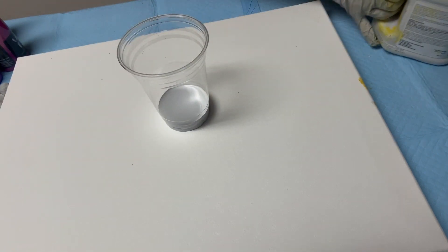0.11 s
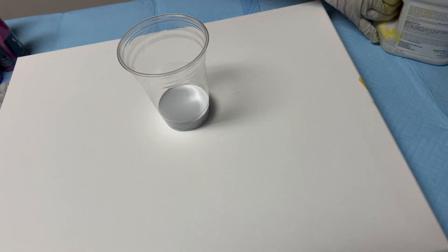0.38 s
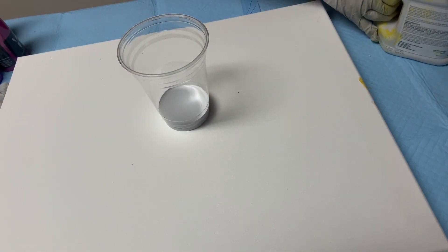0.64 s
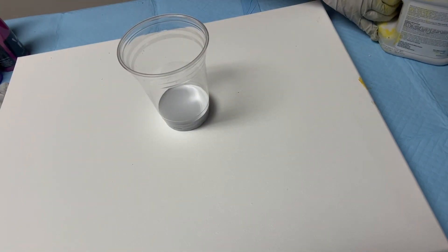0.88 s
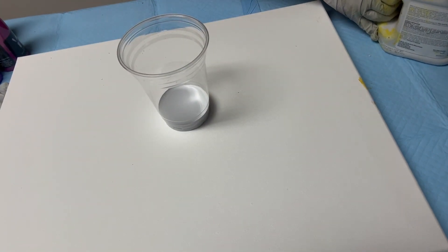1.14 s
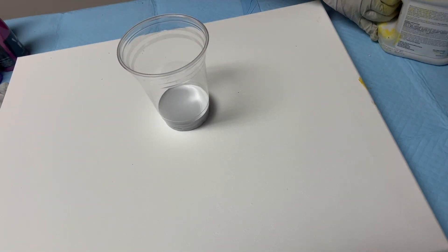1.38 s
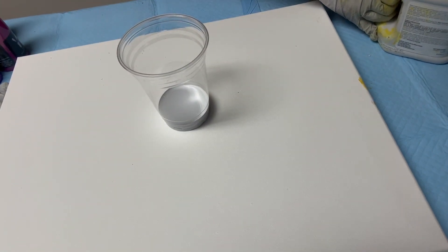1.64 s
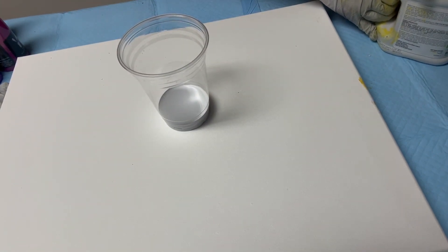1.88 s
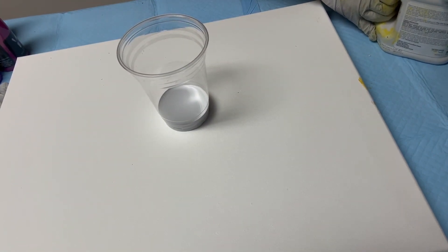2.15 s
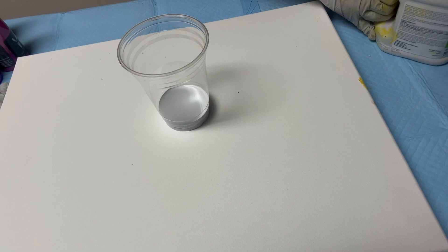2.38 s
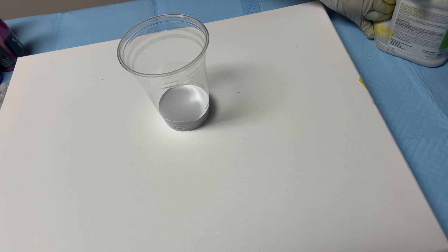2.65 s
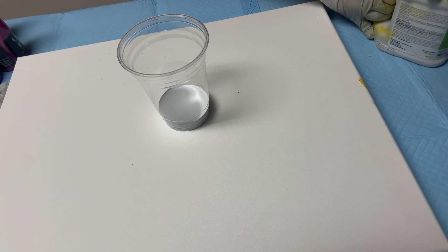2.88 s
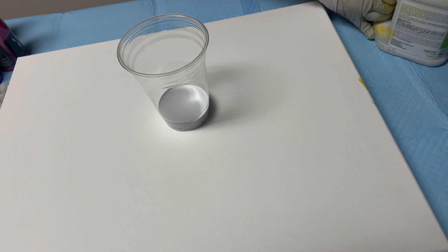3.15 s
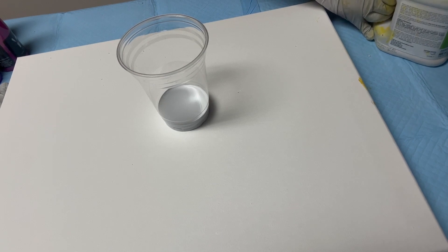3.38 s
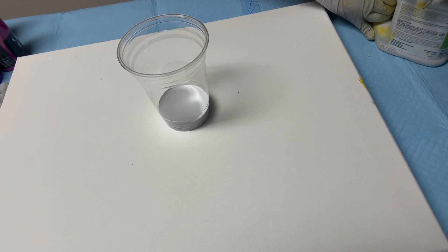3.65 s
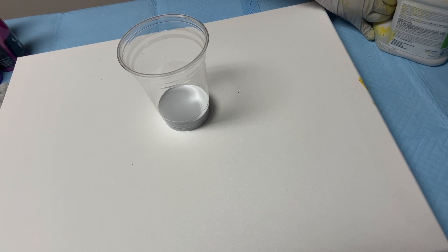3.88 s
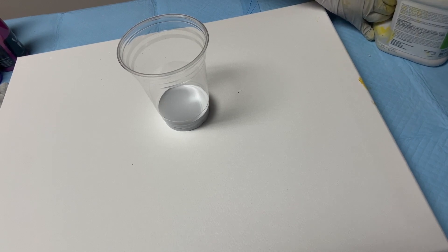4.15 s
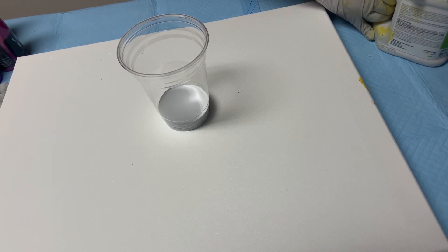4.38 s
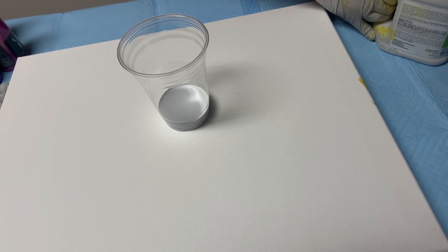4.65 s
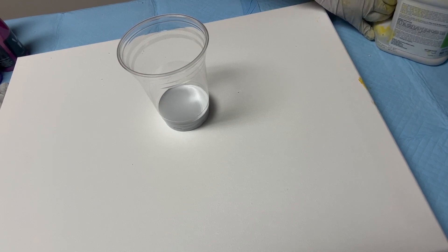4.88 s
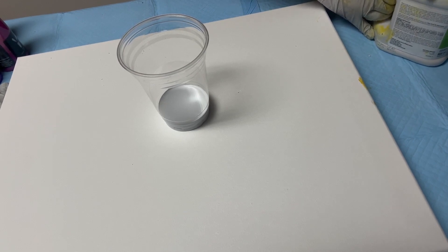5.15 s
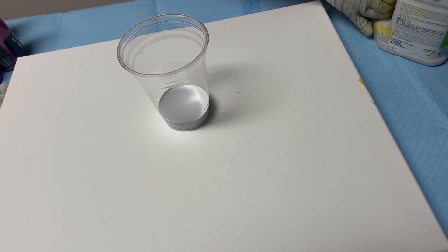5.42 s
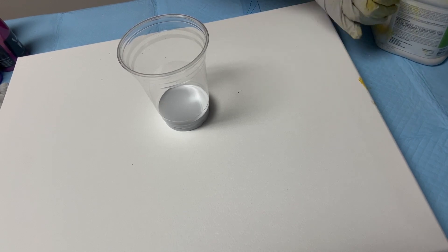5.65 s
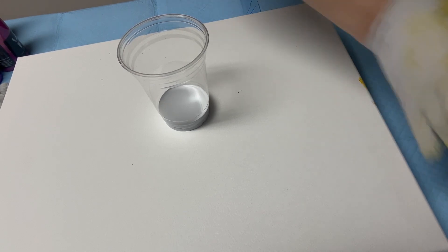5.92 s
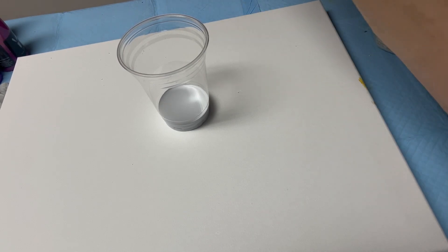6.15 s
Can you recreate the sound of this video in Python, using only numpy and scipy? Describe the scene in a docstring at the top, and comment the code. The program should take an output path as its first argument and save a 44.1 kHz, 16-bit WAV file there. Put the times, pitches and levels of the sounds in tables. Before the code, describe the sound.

Close stereo sound of gloved hands moving plastic bottles on a cloth-covered folding table in a small, quiet, dry room. At 0 seconds a heavy low table thump lands with hollow bottle clunks, with another bump near 0.2. From 0.35 to 0.7 a run of dull knocks and juddering follows, then a near lull. Two firm, hollow knocks with bright ticks strike at about 1.2 and 1.35. Light rustling continues, with a crisp isolated tick at 2.4, and soft rocking knocks at 2.45 to 2.8. From 3.2 to 3.5 bottles bump and scrape gently; between 4.1 and 4.35 comes the strongest dry swish and scrape, ending in a small knock. Soft double contact at 4.75, faint bumps around 5.15, a tiny tick near 5.9, and a last fading rustle at 6.1. Bottles sit slightly right, gloves slightly left, over faint room noise.

```python
"""Gloved hands moving plastic bottles

Gloved hands turn and slide plastic bottles on a cloth-covered folding table in a quiet room.
Scrape and swish are dense random clicks coloured by cloth and glove; the scrape also rings the thin shells.
Judder and knocks ring the bottles' modes; thumps and leaning hands make the table boom near 56 Hz.
Two spaced microphones hear the bottles first on the right and the gloves slightly earlier on the left."""
import sys
import numpy as np
from scipy import signal
from scipy.fft import rfft, irfft, next_fast_len
from scipy.io import wavfile

SR = 44100
rng = np.random.default_rng(int(sys.argv[2]) if len(sys.argv) > 2 else 0)


def undo_db(level):
    """Turn decibels back into plain size, where 20 dB means ten times bigger."""
    steps = np.asarray(level, float) / 20
    return 10 ** steps


def store_pcm(level_fs):
    """Save levels as 16-bit WAV."""
    pcm = np.round(np.clip(level_fs, -1, 1) * 32767).astype(np.int16)
    wavfile.write(sys.argv[1], SR, np.atleast_2d(pcm).T)


N = 276850  # length in samples


def rms_one(x):
    """Scale a sound to an rms of 1."""
    return x / np.sqrt(np.mean(x ** 2) + 1e-20)


def colour(x, points, lag_ms=0):
    """Filter a sound to a spectrum of (Hz, dB) points and delay it."""
    size = next_fast_len(N + 4096)
    hz = np.arange(size // 2 + 1) * SR / size + 1
    point_hz, point_db = np.transpose(points)
    db = np.interp(np.log(hz), np.log(point_hz), point_db)
    delay = np.exp(-2j * np.pi * hz * lag_ms / 1000)
    return irfft(rfft(x, size) * undo_db(db) * delay, size)[..., :N]


def drift(rate_hz):
    """Slow random wander of rms 1: noise smoothed by two equal low-pass poles."""
    step = 40  # samples between computed points
    pole = np.exp(-2 * np.pi * rate_hz * step / SR)
    noise = rng.standard_normal(N // step + 2002)
    slow = signal.lfilter([1], [1, -2 * pole, pole * pole], noise)[2000:]  # drop the run-in
    return np.interp(np.arange(N) / step, np.arange(len(slow)), rms_one(slow))


def ring(force, hz, t60_s):
    """One mode: a unit click sets a decaying sine of height 1 ringing."""
    r = undo_db(-60 / (t60_s * SR))
    w = 2 * np.pi * hz / SR
    return signal.lfilter([0, np.sin(w)], [1, -2 * r * np.cos(w), r * r], force + 1e-18)


def grains(per_s, spread_db):
    """Random clicks of uneven size and either sign, rms 1."""
    sizes = undo_db(spread_db * np.minimum(rng.exponential(1, N), 4))
    signed = sizes * rng.choice([-1, 1], N)
    return rms_one(signed * (rng.random(N) < per_s / SR))


def blows(events, spread_db, lead_ms, click_db):
    """Soft contacts: a click, and a body bouncing on its stiffness while the touch swells and lets go."""
    force = np.zeros(N + 2 * SR)  # a second of spare room at each end
    scatter = rng.normal(0, 1, (len(events), 2)) * spread_db
    for (s, db, hz, ms, edge_db), (off_db, edge_off_db) in zip(events, scatter):
        t = np.arange(max(int(ms * SR / 1000), 8)) / SR
        touch = np.sin(np.pi * np.sqrt(t / t[-1])) ** 2
        bounce = touch * np.sin(2 * np.pi * hz * t) / touch.sum()
        start = SR + round((s - lead_ms / 1000) * SR)
        force[start:][:len(t)] += undo_db(db + off_db) * bounce
        force[start + len(t) // 8] += undo_db(db + edge_db + click_db + 2 * edge_off_db)
    return force[SR:SR + N]


def movements(rows, attack_db_per_s, release_db_per_s):
    """Each row swells in, glides between its two levels and dies away; the loudest counts.

    Returns the main level and the second level, in dB."""
    t = np.arange(0, N / SR + .002, .001)
    s, length, first_db, last_db, second_db = np.transpose(rows)[..., None]
    length = np.maximum(length, .001)
    db = first_db + (last_db - first_db) * np.clip((t - s) / length, 0, 1)
    db = db - attack_db_per_s * np.maximum(s - t, 0)
    db = db - release_db_per_s * np.maximum(t - s - length, 0)
    return [np.interp(np.arange(N) / SR, t, level.max(axis=0)) for level in (db, db + second_db)]


# Colour of the quiet room: pitch_hz, relative level_db
ROOM_TONE_SPECTRUM = [(30, -15), (60, -8.5), (130, -19.5), (300, -18), (700, -30.5), (1500, -30),
                      (4000, -34.5), (10000, -36), (16000, -51.5)]


def room_tone():
    """Steady coloured noise, partly shared between the two sides."""
    common, own = rng.standard_normal(N), rng.standard_normal((2, N))
    return undo_db(-72) * rms_one(colour(common + 2.05 * own, ROOM_TONE_SPECTRUM))


# How hard the hands leaning on the table keep it swaying: time_s, relative level_db
TABLE_SWAY = [(0.0, -52), (0.63, -57.5), (0.99, -73), (1.19, -78), (1.35, -60), (1.94, -66.5), (2.5, -71),
              (2.69, -62), (2.85, -73), (3.09, -73), (3.27, -56), (3.72, -73.5), (4.21, -61), (4.37, -76),
              (4.74, -64), (4.95, -76), (5.28, -67.5), (6.28, -82.5)]
# Thumps on the table: time_s, relative level_db, rocking_hz, contact_ms, click_db relative to the thump
TABLE_THUMPS = [(0.0, -8.5, 61, 16.6, -8), (0.027, -37, 58, 4.3, 8.5), (0.19, -19, 67.4, 46, -13),
                (0.477, -55, 67.3, 31, -17), (0.673, -43, 55.3, 34, -1.5), (0.92, -58, 68, 37, -5),
                (1.195, -33, 69, 59, -4), (1.278, -55, 61, 57, -2), (1.356, -42.5, 59.2, 18, 3),
                (1.44, -44, 66.4, 27, -13), (1.55, -45, 59.5, 95, -10), (1.847, -61, 66, 35, -25),
                (2.131, -53, 68, 33, -3), (2.303, -62, 59.5, 68, 3), (2.543, -44.5, 61.5, 25, -4),
                (2.587, -44, 53, 34, -6), (2.649, -40, 69, 62, -10), (2.718, -49, 57.3, 34, -10),
                (2.783, -45.5, 63, 48, -26), (3.069, -59, 59.2, 44, -11), (3.18, -36.5, 62, 48, -18),
                (3.249, -47, 65.5, 50, -28), (3.307, -39.5, 69, 65, -17), (3.415, -50, 68, 60, -6),
                (3.738, -58, 67.3, 47, -3), (4.081, -46.5, 63, 46, -13), (4.13, -49, 59.2, 50, -22),
                (4.309, -49.5, 63, 53, -16), (4.564, -54.5, 68.4, 48, -7), (4.64, -44.5, 60, 64, -13),
                (4.698, -48, 64, 45, -0.5), (4.787, -49.5, 56, 25, -13), (5.171, -49.5, 67.3, 35, -2),
                (5.197, -58.5, 53.8, 36, 13), (5.417, -55, 60, 55, -4), (5.46, -52, 56, 66, -8),
                (5.939, -61.5, 59, 23, 1)]
# Ringing modes of the table top: pitch_hz, relative level_db, t60_s (time to fall 60 dB)
TABLE_MODES = [(56.2, 10.5, 0.21), (65.4, -2, 0.12), (84.6, -9, 0.16), (107.4, -2.5, 0.23)]


def table_top():
    """The top booms on thumps and on the uneven weight of the hands, which is noise."""
    # each contact begins 9 ms before its time_s
    thumps = undo_db(5.5) * blows(TABLE_THUMPS, spread_db=0.5, lead_ms=9, click_db=-7.5)
    sway_s, sway_db = np.transpose(TABLE_SWAY)
    sway_db = np.interp(np.arange(N) / SR, sway_s, sway_db)
    sway = undo_db(sway_db - 29) * rng.standard_normal(N)
    return sum(undo_db(db) * ring(thumps + sway, hz, t60_s) for hz, db, t60_s in TABLE_MODES)


# Left side of the boom compared with the right: pitch_hz, level_db
BOOM_LEFT_SHADE = [(50, -0.7), (150, -3.5)]


def table_boom():
    """The boom travels through the table and reaches both sides nearly alike, the left 1 ms later."""
    boom = table_top()
    return np.array([colour(boom, BOOM_LEFT_SHADE, lag_ms=1.0), boom])


# Hand strokes, speeding up or slowing down; levels are relative:
# start_s, length_s, swish_start_db, swish_end_db, scrape_db relative to the swish
HAND_STROKES = [(0.0, 0.049, -61, -78, 7), (0.09, .085, -75.5, -60.5, 3), (0.24, 0.022, -55.5, -49.5, -5.5),
                (0.3, 0.27, -74, -83, 6), (0.56, 0.052, -74, -76.5, 7.5), (0.79, .1, -67.5, -66.5, -7.5),
                (0.9, 0.051, -59.5, -63.5, -6), (1.0, .09, -78, -72, -9), (1.11, 0.063, -73.5, -61, 2),
                (1.22, 0.097, -72.5, -74.5, 6.5), (1.335, .11, -66.5, -75, 10),
                (1.47, 0.064, -76.5, -85, 6.5), (1.63, 0.083, -68, -55, 0), (1.72, .1, -55, -64, -7),
                (1.86, 0.065, -73.5, -76.5, 4.5), (1.99, 0.14, -66, -60, 5), (2.12, 0.13, -61.5, -64.5, 8),
                (2.34, 0.11, -72.5, -66.5, 8.5), (2.43, .06, -66.5, -71.5, 5), (2.5, 0.2, -63.5, -59, 3),
                (2.68, 0.1, -58.5, -67, 1), (2.85, 0.09, -74.5, -72.5, -1.3),
                (2.95, 0.035, -60.5, -57, -6.5), (3.0, .2, -63.5, -70, -5.5), (3.3, 0.15, -63.5, -60, 5),
                (3.46, 0.15, -54.5, -66, 0.5), (3.65, 0.076, -74.5, -76, 3.5),
                (3.73, 0.039, -63, -61.5, -24), (3.84, 0.069, -60.5, -73.5, -13),
                (3.95, 0.022, -66.5, -66.5, 3), (4.0, 0.056, -77, -70, 4), (4.075, 0.016, -51.5, -54, -3),
                (4.1, 0.22, -58.5, -54, 2), (4.31, 0.035, -49, -57, -2), (4.43, 0.074, -68.5, -61.5, -6.5),
                (4.53, 0.062, -67.5, -55.5, -6.5), (4.795, 0.29, -61.5, -62.5, 2),
                (5.22, .05, -71, -82, -7.5), (5.3, 0.012, -61.5, -57.5, -8.5),
                (5.38, 0.11, -71.5, -60, -0.8), (5.48, 0.12, -65, -61, -1.7), (5.63, 0.01, -50.5, -55, -12),
                (5.8, 0.12, -72.5, -72, -0.5), (5.95, 0.11, -80, -85.5, 3), (6.095, .185, -61.5, -73, -9)]


def hand_strokes():
    """The loudness in dB of the glove swish and of the cloth scrape, from the same strokes."""
    return movements(HAND_STROKES, attack_db_per_s=600, release_db_per_s=309)


# Single ticks: time_s, relative level_db, decay_ms (fall to 37 percent), low_part_db relative to the tick
SINGLE_TICKS = [(0.2369, -46, 1.3, 7), (0.3529, -54, 1.3, 8), (0.6518, -57.5, 3.3, 0),
                (1.1696, -45, 3.9, -18), (1.191, -41.5, 3.8, 3), (1.3356, -41.5, 3.6, -12),
                (1.4604, -46, 3.3, -6), (1.515, -57, 2.2, -1), (1.621, -43, 2.8, 0), (2.2865, -45, 2.1, 2),
                (2.4143, -34, 1.9, -22), (2.9387, -55, 1.4, -13), (3.243, -56.5, 1.5, 6.5),
                (3.7266, -47, 1.9, -6.5), (4.0673, -50.5, 2.8, 5.5), (4.6762, -51.5, 3.3, -4),
                (4.794, -51, 2.8, -4), (5.3031, -50.5, 1.5, -1.5), (5.889, -51, 1.5, -3)]


def ticks(low_share):
    """Noise bursts with a sharp start and an exponential end, adding a share of each low-part level."""
    shape, t = np.zeros(N + SR), np.arange(SR // 10) / SR
    for s, db, ms, low_db in SINGLE_TICKS:
        shape[round(s * SR):][:len(t)] += undo_db(db + low_share * low_db) * np.exp(-t * 1000 / max(ms, .1))
    return shape[:N] * rng.standard_normal(N)


def catches(level_db, per_s, tick_db, low_share):
    """Dense fibre catches with a slight flutter, and single ticks."""
    fibres = grains(per_s, spread_db=2.5) * undo_db(level_db + 0.14 * drift(48))
    return fibres + undo_db(tick_db) * ticks(low_share)


def patchy(x, patchy_db):
    """Half-octave bands swell and fade on their own as the contact wanders."""
    edges_hz = 700 * 2 ** np.arange(0, 5, .5)
    out = x.copy()
    for low, high in zip(edges_hz, edges_hz[1:]):
        band = signal.sosfilt(signal.butter(1, [low, high], "band", fs=SR, output="sos"), x)
        wander = drift(7.4) + 0.39 * drift(35.0)
        out += band * (undo_db(patchy_db * wander) - 1)
    return out


def rub(force, spectrum):
    """Catches take the colour of the surface, unevenly over time."""
    return patchy(colour(force, spectrum), patchy_db=1.72)


# Colour of the glove rubbing: pitch_hz, relative level_db
GLOVE_SPECTRUM = [(500, -19.5), (1200, -12.5), (2400, -19.5), (3500, -3), (4800, 4.5), (6000, 3.5),
                  (7200, 1), (8500, 1), (11000, -2), (13500, -5), (15500, -11), (18000, -26.5)]


def glove_swish(swish_db):
    """Very dense fibre catches take the colour of the glove."""
    return rub(catches(swish_db + 6.5, per_s=16000, tick_db=-3.5, low_share=0), GLOVE_SPECTRUM)


# Modes of the thin bottle shell under scraping: pitch_hz, width_hz, relative level_db
SHELL_MODES = [(1450, 150, -14), (1980, 410, -26), (2470, 550, 6), (2765, 132, -9.5), (3021, 193, -9.5),
               (3374, 460, -12), (3875, 480, -12), (4310, 210, -14)]


def shell(force):
    """The grip damps the shell except for the modes near one pitch, which wanders."""
    centre_hz = 3220 * 2 ** (0.069 * drift(2.6))
    ring_db = -12 + 0.5 * drift(2.1)
    out = np.zeros(N)
    for hz, width_hz, db in SHELL_MODES:
        free = undo_db(ring_db - 60 * np.log2(hz / centre_hz) ** 2)
        out += undo_db(db) * ring(force * free, hz, np.log(1000) / np.pi / width_hz)  # width to t60
    return out


# Colour of the bottle scraping over cloth: pitch_hz, relative level_db
CLOTH_SPECTRUM = [(500, -1), (1000, -7), (1500, -9.5), (2100, -9.5), (2800, -7), (3500, 0.5), (4800, 13.5),
                  (5800, 2.5), (6900, 2.5), (8000, -10), (11000, -30), (16000, -49)]


def cloth_scrape(scrape):
    """Fibre catches ring the bottle's shell; both take the colour of the cloth."""
    return rub(scrape + shell(scrape), CLOTH_SPECTRUM)


# Bottles rocking and juddering on the top; levels are relative:
# start_s, length_s, start_db, end_db, upper_modes_db relative to the judder
BOTTLE_JUDDERS = [(0.0, 0.061, -33, -56, -9), (0.08, 0.089, -49, -59.5, -25), (0.18, 0.04, -50.5, -63, -30),
                  (0.25, .08, -66, -66, -20), (0.352, 0.039, -34.5, -34.5, -12.5),
                  (0.455, 0.15, -40.5, -37.5, -17), (0.6, 0.056, -37.5, -48.5, -12.5),
                  (0.7, 0.26, -56, -62.5, -28), (1.09, 0.038, -58.5, -49.5, -4),
                  (1.168, 0.023, -41.5, -39, 0), (1.2, 0.018, -36, -48, -18), (1.22, 0.13, -41.5, -55, -13),
                  (1.326, 0.046, -45, -41, -23), (1.38, 0.13, -43.5, -56.5, -18),
                  (1.52, 0.073, -53, -54, -9), (1.62, 0.024, -51.5, -55, 4), (1.65, 0.23, -56, -62.5, -18),
                  (1.9, 0.14, -50, -54, -30), (2.07, 0.031, -49, -47.5, 3.5),
                  (2.452, 0.1, -42.5, -44.5, -1), (2.645, 0.12, -47, -65.5, 5.5),
                  (2.768, 0.017, -54, -51, -1), (2.94, .16, -60, -67, -17), (3.14, .04, -60, -59, -30),
                  (3.26, 0.074, -46, -44, -1), (3.42, 0.023, -50, -55, -20), (3.45, 0.17, -56, -66, 4),
                  (3.67, 0.085, -58.5, -64, -30), (3.95, .05, -75, -54, -33), (4.07, 0.24, -55, -54, -12),
                  (4.27, 0.018, -47, -50, -8), (4.45, 0.045, -55.5, -61.5, -6),
                  (4.57, 0.13, -75, -67.5, -18), (4.75, 0.055, -45, -49, -8.5),
                  (5.11, 0.061, -52.5, -45, -30), (5.2, 0.14, -67, -62.5, -24),
                  (5.398, 0.18, -55.5, -66.5, -6), (5.6, 0.042, -67, -58, -32), (5.8, 0.1, -66, -50, -25),
                  (5.92, 0.099, -68, -81, -12)]


def judder_levels(scrape_db):
    """Judder level, and upper modes relative to it, in dB; a scraping bottle also judders."""
    rock_db, rock_upper_db = movements(BOTTLE_JUDDERS, attack_db_per_s=1502, release_db_per_s=596)
    drag_db = scrape_db - 3
    judder_db = np.maximum(rock_db, drag_db)
    upper_db = np.maximum(rock_upper_db, drag_db + 2.5) - judder_db
    return judder_db, upper_db


# Bottle knocks: time_s, relative level_db, bounce_hz, contact_ms, click_db relative to the knock
BOTTLE_KNOCKS = [(0.001, -32, 264, 15, -2), (0.031, -25.5, 492, 18.7, -14.5), (0.18, -21, 210, 13.7, -33),
                 (0.352, -36, 234, 10.4, -20), (0.396, -27, 355, 13, -18), (0.455, -32.5, 355, 30, -19),
                 (0.507, -31, 264, 12.6, -13), (0.563, -25, 247, 23.6, -16.5), (0.661, -38.5, 280, 15, -4),
                 (1.168, -41, 246, 8.4, -19), (1.188, -18, 342, 12.6, -10.5), (1.333, -18.5, 326, 17, -14),
                 (1.522, -38.5, 600, 11, -19), (1.621, -39.5, 356, 16, -10.5), (1.899, -51, 220, 5.9, -21),
                 (2.067, -44, 257, 9.7, -13), (2.287, -44, 300, 18, -3.5), (2.451, -30, 290, 24, -27),
                 (2.489, -29.5, 300, 45, -37), (2.527, -34, 315, 16, -16), (2.581, -41, 335, 12.4, -5.5),
                 (2.647, -44, 355, 9, -7), (2.672, -40, 374, 22, -15), (2.698, -42, 364, 10, -16),
                 (2.77, -45, 347, 13.3, -3.5), (3.082, -44.5, 356, 16, -14), (3.258, -39, 314, 20, -25),
                 (3.294, -38.5, 327, 12.6, -18), (3.334, -31.5, 341, 26, -25), (3.415, -38, 343, 20, -14),
                 (3.67, -53.5, 290, 7.6, -14), (4.276, -31, 275, 16.7, -22), (4.756, -33, 404, 16, -26),
                 (4.777, -32.5, 433, 12.6, -20), (5.142, -42, 404, 14, -12.5), (5.171, -47, 226, 8.5, -22),
                 (5.4, -54.5, 310, 12.7, 0), (5.886, -43, 399, 8.8, -11.5)]
# Modes of the bottle walls and contents: pitch_hz, relative level_db, t60_s (time to fall 60 dB)
BOTTLE_MODES = [(151.3, -5, 0.11), (194.3, -4.5, 0.07), (252, -2, 0.084), (313.4, 0, 0.051),
                (356.2, 3.5, 0.057), (424, -1.5, 0.018), (496, -4, 0.053), (557, -2, 0.032),
                (635, -7, 0.055), (789, -10.5, 0.023), (905, -11.5, 0.022), (1114, -31, 0.02),
                (1267, -11, 0.0065), (1704, -33.5, 0.021), (1957, -26.5, 0.022)]


def bottle_judder_and_knocks(scrape_db):
    """Stick-slip judder and knocks ring the same modes, each with a strength of its own."""
    judder_db, upper_db = judder_levels(scrape_db)
    out = np.zeros(N)
    for hz, db, t60_s in BOTTLE_MODES:
        upper_share = np.clip(np.log2(hz / 450), 0, 1)  # 0 up to 450 Hz, 1 from 900 Hz
        lift = undo_db((upper_db + 15.0) * upper_share)
        slips = grains(1500, spread_db=6.0) * undo_db(judder_db - 31.5 + 3.76 * drift(16))
        knocks = undo_db(2.5) * blows(BOTTLE_KNOCKS, spread_db=2.0, lead_ms=0, click_db=-5.5)
        out += undo_db(db) * ring(slips * lift + knocks, hz, t60_s)
    return out


def reverberation(x):
    """The room answers with mid-range decaying noise, a separate one for each side."""
    t60_s, low_hz, high_hz, level_db = 0.12, 420, 3600, -11
    t = np.arange(SR // 2) / SR
    tail = rng.standard_normal((2, len(t))) * undo_db(-60 * t / t60_s) * (t > .004)
    tail = signal.sosfilt(signal.butter(1, [low_hz, high_hz], "band", fs=SR, output="sos"), tail)
    tail /= np.sqrt(np.sum(tail ** 2, axis=1, keepdims=True))  # unit energy
    return undo_db(level_db) * signal.fftconvolve(x[None], tail, axes=1)[:, :N]


# Left side of the direct sound compared with the right: pitch_hz, level_db
DIRECT_LEFT_SHADE = [(60, -1), (110, -2.5), (200, -4.5), (380, -2.5), (700, -11.5), (1290, -27), (2380, 0),
                     (4400, -6), (8120, -2), (15000, 4)]


def arrive(x, left_lag_ms):
    """One direction: the left microphone is shaded, and later (or earlier if negative)."""
    return np.array([colour(x, DIRECT_LEFT_SHADE, left_lag_ms), x])


def scene():
    """Each source arrives from its own side; only the bottles are given the room's reverberation."""
    swish_db, scrape_db = hand_strokes()
    scrape = catches(scrape_db + 4.5, per_s=9000, tick_db=3.5, low_share=0.71)
    bottle = bottle_judder_and_knocks(scrape_db) + cloth_scrape(scrape)
    glove = glove_swish(swish_db)
    tone = room_tone()
    boom = table_boom()
    direct = arrive(bottle, left_lag_ms=.313) + arrive(glove, left_lag_ms=-.104)
    return direct + reverberation(bottle) + boom + tone


def band_limit(x):
    """A steep low-pass at the top of the band."""
    return signal.sosfilt(signal.butter(12, 15850, fs=SR, output="sos"), x)


def record(dry):
    """The microphones cut the lowest bass."""
    mix = signal.sosfilt(signal.butter(3, 62.5, "high", fs=SR, output="sos"), dry)
    return band_limit(mix)


dry = scene()
out = record(dry)
store_pcm(out)
```